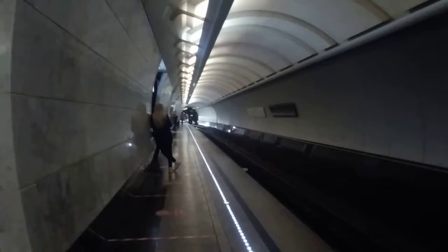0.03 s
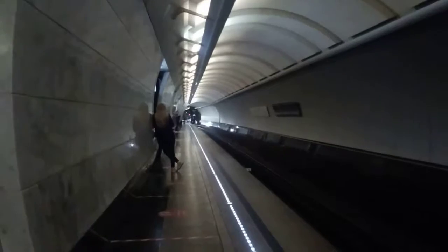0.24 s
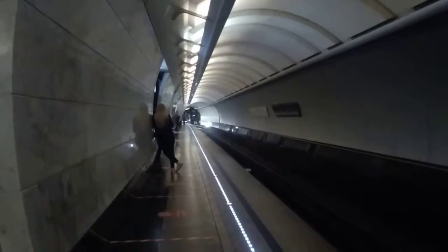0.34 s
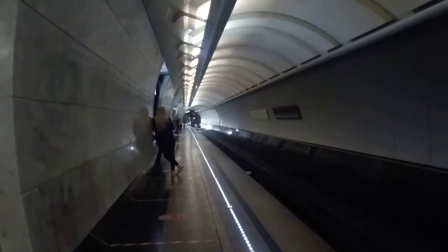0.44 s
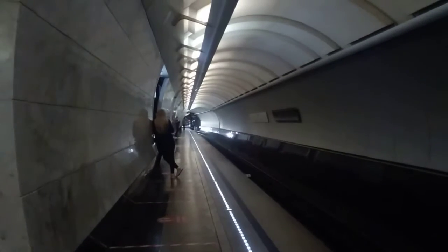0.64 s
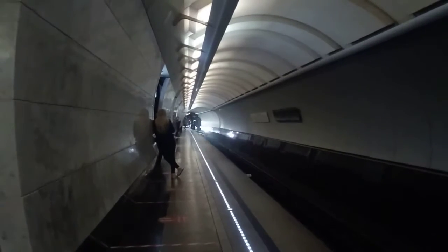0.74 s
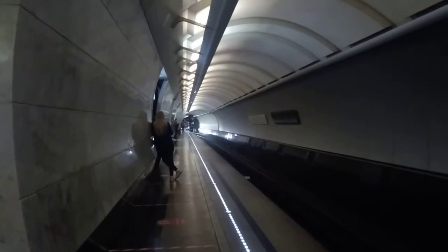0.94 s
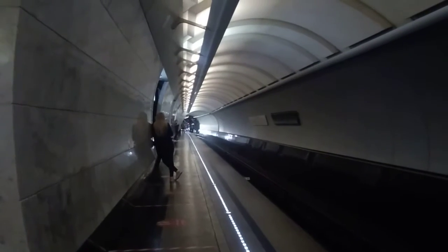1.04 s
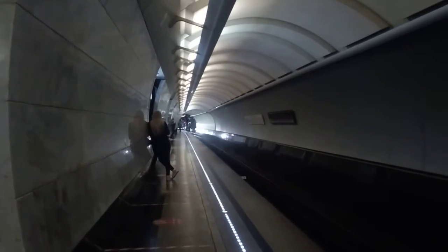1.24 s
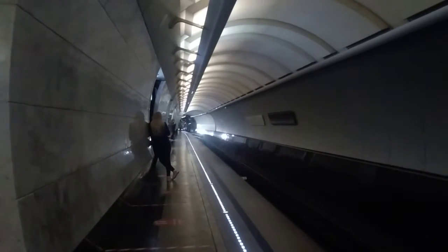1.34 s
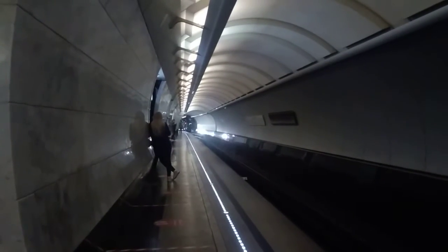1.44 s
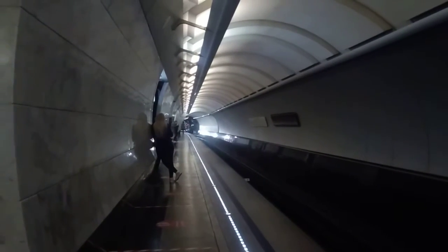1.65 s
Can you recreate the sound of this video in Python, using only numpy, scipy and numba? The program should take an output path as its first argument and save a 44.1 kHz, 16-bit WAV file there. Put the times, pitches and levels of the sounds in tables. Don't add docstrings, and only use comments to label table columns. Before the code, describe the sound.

An underground train rumbles through a vaulted tunnel with ringing wheels, then drops away into quiet hum

```python
import sys
import numpy as np
from scipy import signal
from scipy.io import wavfile
from scipy.ndimage import uniform_filter1d
from numba import njit

SR = 44100
rng = np.random.default_rng(int(sys.argv[2]) if len(sys.argv) > 2 else 0)


def master_out(mix):
    frames = np.transpose(np.atleast_2d(mix))
    ceiling = np.clip(frames, -1, 1)
    pcm = np.round(ceiling * 32767).astype(np.int16)
    wavfile.write(sys.argv[1], SR, pcm)


def how_loud(loudness_db):
    steps = np.asarray(loudness_db, float) / 20
    return 10 ** steps


N = 74970
T = np.arange(N) / SR
START_S = 0.1148
TILT_HZ = 960

# pitch in Hz, strength in dB per Hz.
HALL_COLOUR = [(110, 5), (268, -0.5), (400, -10.5), (600, -5), (900, -22), (1600, -19), (5500, -42),
               (14000, -69)]
# pitch in Hz, width in Hz, level in dB.
HALL_RINGS = [(245.5, 73, -6.5), (1045, 194, -18.5), (1427, 95, -19), (5140, 500, -38), (7600, 64, -47.5),
              (7800, 530, -46)]
# start in seconds, peak level in dB, pitch in Hz.
STEP_EVENTS = [
    (1.337, -34, 275),
    (1.607, -18.5, 266),
]
# time in seconds, level in dB.
TICK_EVENTS = [(1.0745, -57), (1.0775, -58), (1.0835, -61), (1.112, -64), (1.1335, -63), (1.1535, -61)]
# time in seconds, pitch in Hz, level in dB, length in seconds.
GROAN_EVENTS = [(0.166, 207, -36.5, 0.0051), (0.412, 233, -35.5, 0.059), (0.497, 260.6, -32, 0.023),
                (0.623, 263, -24, 0.021), (0.692, 211, -27, 0.017), (0.868, 195, -30.5, 0.026),
                (1.038, 205, -40, 0.0092), (0.36, 1090, -39.5, 0.037), (1.008, 1016, -38.5, 0.02),
                (1.105, 600, -40, 0.034), (1.267, 631, -47, 0.03), (1.339, 680, -46, 0.0045),
                (1.338, 254, -43, 0.013), (1.408, 240, -44, 0.0092), (1.495, 237, -45.5, 0.015),
                (1.381, 490, -42.5, 0.014), (1.463, 524, -48, 0.024), (1.515, 600, -52, .012),
                (1.571, 200, -43, .025), (1.65, 600, -50, 0.012)]
# pitch in Hz, width in Hz, level in dB.
MOUTH_MODES = [(55, 20, -9), (69.5, 14.3, 5), (94.5, 36, -5.5)]
# time in seconds, level in dB, length in seconds.
PRESSURE_SWELLS = [(0.165, -47, 0.027), (0.305, -32.5, 0.048), (0.409, -26, 0.044), (0.551, -24.5, 0.033),
                   (0.662, -26.5, 0.055), (0.783, -30, .04), (0.899, -24.5, 0.045), (1.045, -32, 0.025),
                   (1.146, -41.5, 0.026), (1.263, -27, 0.03), (1.46, -43, .03), (1.64, -45.5, 0.054)]
# time in seconds, level in dB, brightness in dB per octave above TILT_HZ.
TRAIN_COURSE = [(.115, -75, 11), (.125, -53.5, 1.5), (.18, -43.5, 2.5), (.26, -39.5, 3), (.33, -36, 3.5),
                (.45, -34, 3), (.60, -33.5, 2), (.80, -33.5, -0.5), (.98, -32.5, -1), (1.04, -33.5, -0.5),
                (1.075, -39, -2), (1.115, -46.5, -4.5), (1.19, -60.5, -4.5), (1.25, -70, 1.5)]
# pitch in Hz, strength in dB per Hz.
ROAR_COLOUR = [(110, 5.5), (263, -5), (455, -16.5), (900, -16.5), (2080, -17), (4500, -30), (8200, -57.5),
               (14000, -76)]
# pitch in Hz, width in Hz, level in dB.
LINING_MODES = [(176.5, 53, 0.5), (250, 65, -2.5), (301.2, 51.4, -4), (600, 204, -5.5)]
# pitch in Hz, width in Hz, level in dB.
WHEEL_MODES = [(1095, 80, 1.5), (1430, 60, -5), (1800, 45, -7), (2070, 220, -8), (2990, 100, -12),
               (3540, 140, -18), (3990, 140, -12), (5040, 200, -19), (6080, 190, -26), (7230, 120, -40),
               (8280, 150, -41)]
# start in seconds, pitch in Hz, width in Hz, level in dB against the train.
RIM_SONG = [
    (.655, 7500, 70, -45),
    (.655, 7680, 320, -39),
    (.90, 10080, 170, -46.5),
    (.88, 5600, 1200, -31),
]


def level(x):
    return x / np.sqrt(np.mean(x ** 2))


@njit
def svf(x, hz, width):
    y, band, low = np.empty(len(x)), 0., 0.
    g, k = np.tan(np.pi * hz / SR), width / hz
    for i in range(len(x)):
        v = (band + g * (x[i] - low)) / (1 + g * (g + k))
        band, low, y[i] = 2 * v - band, low + 2 * g * v, k * v
    return y


def ring(hz, width_hz):
    once = svf(rng.standard_normal(N), 1. * hz, 1.44 * width_hz)
    return level(svf(once, 1. * hz, 1.44 * width_hz))


def walk(rate):
    hold = int(SR / rate)
    held = np.repeat(rng.standard_normal(N // hold + 1), hold)
    return 1.33 * uniform_filter1d(uniform_filter1d(held, hold), hold)[:N]


def bump(t, length_s):
    return np.exp(-.5 * ((T - t) / length_s) ** 2)


def even(x):
    return x / np.sqrt(uniform_filter1d(x ** 2, size=2600))


def wash(colour, swell_db, flicker_db, tilt=0.):
    hz_points, db_points = np.transpose(colour)
    swell = swell_db * walk(10.3)
    out = 0
    for hz in 125 * 2 ** np.arange(0, 6.8, 1 / 3):
        db = np.interp(np.log(hz), np.log(hz_points), db_points)
        db = db + 10 * np.log10(hz / 125)
        db = db + swell + flicker_db * walk(18)
        octaves = max(np.log2(hz / TILT_HZ), 0)
        out = out + how_loud(db + tilt * octaves) * ring(hz, hz / 5)
    return level(out)


def hall():
    rise_s, start_db = 0.19, -6.5
    hum = wash(HALL_COLOUR, swell_db=0.4, flicker_db=1.9)
    rings = sum(how_loud(db + 0.7 * walk(12.3)) * ring(hz, width) for hz, width, db in HALL_RINGS)
    rise_db = start_db * np.clip(1 - (T - START_S) / rise_s, 0, 1)
    return how_loud(-44 + rise_db) * (hum + rings)


def steps():
    attack_s, t60_s = 0.0028, 0.037
    out = 0
    for t, db, hz in STEP_EVENTS:
        since = np.maximum(T - t, 0)
        attack = 1 - np.exp(-since / attack_s)
        decay = np.exp(-np.log(1000) * since / t60_s)
        out = out + how_loud(db) * np.sin(2 * np.pi * hz * since) * attack * decay
    return out


def ticks():
    puffs = sum(how_loud(db) * bump(t, 0.001) for t, db in TICK_EVENTS)
    return puffs * np.tanh(2 * ring(5450, 900))


def groans():
    out = 0
    for t, hz, db, length_s in GROAN_EVENTS:
        width_hz = min(0.14 * hz, 150)
        out = out + how_loud(db) * bump(t, length_s) * even(ring(hz, width_hz))
    return out


def boom():
    bed = how_loud(-58.5)
    push = bed + sum(how_loud(db) * bump(t, length_s) for t, db, length_s in PRESSURE_SWELLS)
    return push * even(sum(how_loud(db) * ring(hz, width) for hz, width, db in MOUTH_MODES))


def lining():
    return sum(how_loud(db + 1.6 * walk(14.16)) * ring(hz, width) for hz, width, db in LINING_MODES)


def wheels(tilt):
    fade_from_s, fade_db_per_s = 0.34, -11.5
    fade_db = fade_db_per_s * np.maximum(T - fade_from_s, 0)
    peak_db = 3 * bump(0.44, 0.05)
    out = 0
    for hz, width, db in WHEEL_MODES:
        octaves = max(np.log2(hz / TILT_HZ), 0)
        move_db = (tilt + fade_db) * octaves + 1.5 * walk(30.36) + peak_db
        width_db = 10 * np.log10(width / 70)
        out = out + how_loud(-9.5 + db + width_db + move_db) * ring(hz, width)
    return out


def rim_song():
    rise_s = 0.03
    out = 0
    for t, hz, width, db in RIM_SONG:
        rise = np.clip((T - t) / rise_s, 0, 1)
        out = out + rise * how_loud(db + 4.9 * walk(25)) * ring(hz, width)
    return out


def train():
    gone_db, gone_after_s = -80.5, 0.12
    lining_lag_s, song_lag_s = 0.021, 0.043
    time, db, brightness = np.transpose(TRAIN_COURSE)
    tilt = np.interp(T, time, brightness)
    gain_db = np.interp(T, np.append(time, time[-1] + gone_after_s), np.append(db, gone_db))
    roar = how_loud(2) * wash(ROAR_COLOUR, swell_db=0.5, flicker_db=1.55, tilt=tilt)
    late_lining = how_loud(np.interp(T - lining_lag_s, T, gain_db)) * lining()
    ringing = wheels(tilt)
    late_song = how_loud(np.interp(T - song_lag_s, T, gain_db)) * rim_song()
    air = how_loud(-43) * ring(12500, 8400)
    return how_loud(gain_db) * (roar + ringing + air) + late_lining + late_song


def scene():
    return (train() + boom() + groans() + hall() + ticks() + steps())[None, :]


def top_cut(x):
    return signal.sosfilt(signal.butter(12, 14160, fs=SR, output="sos"), x)


def record(dry):
    edge_hz, shelf_db, open_s = 7800, -5.5, 0.004
    low = signal.sosfiltfilt(signal.butter(8, edge_hz, fs=SR, output="sos"), dry)
    mic = low + how_loud(shelf_db) * (dry - low)
    mix = mic * np.clip((T - START_S) / open_s, 0, 1)
    return top_cut(mix)


dry = scene()
out = record(dry)
master_out(out)
```